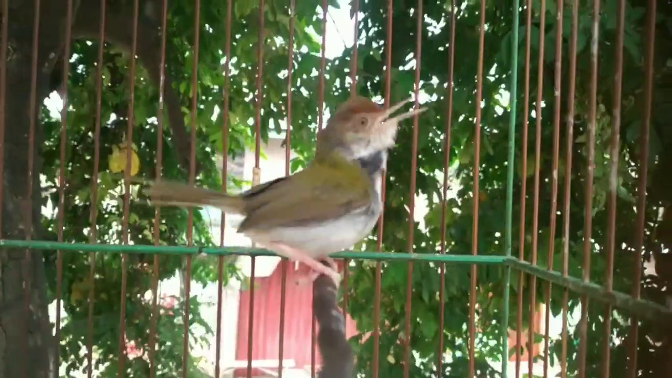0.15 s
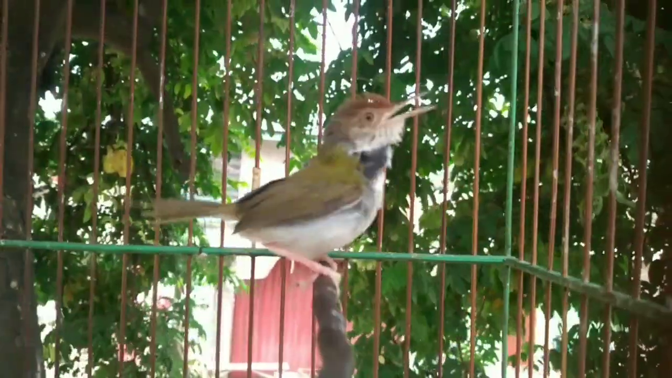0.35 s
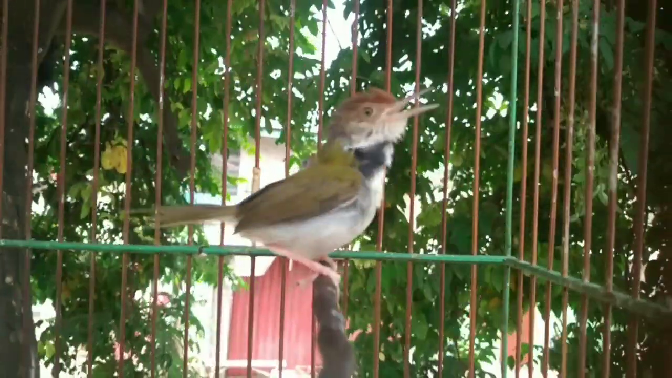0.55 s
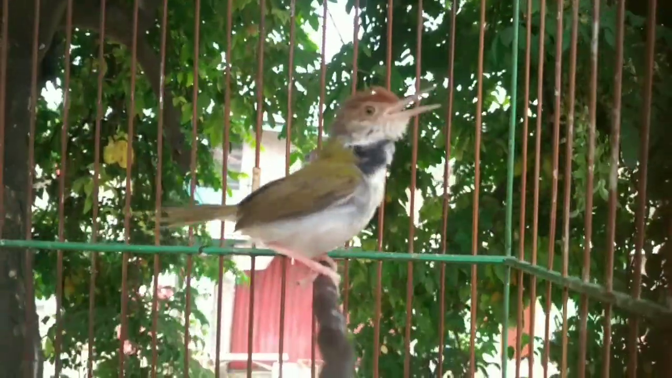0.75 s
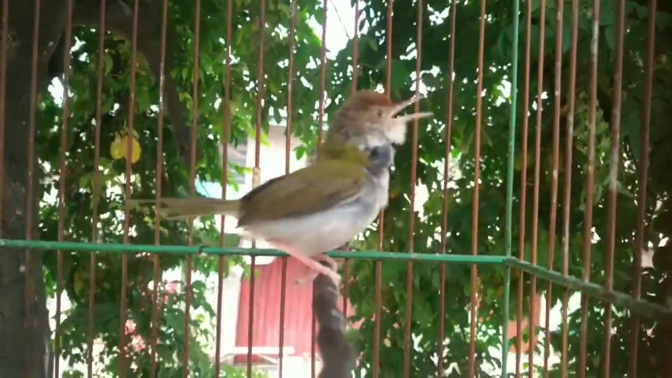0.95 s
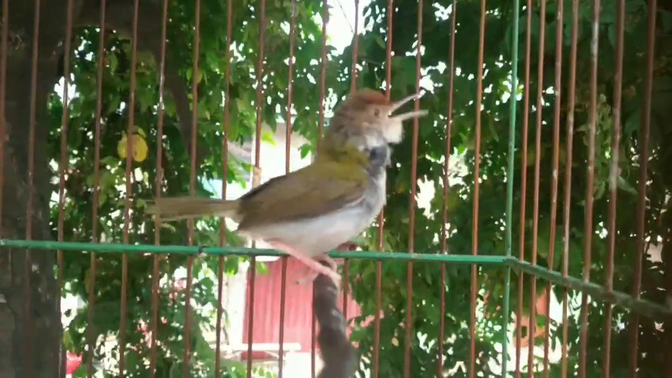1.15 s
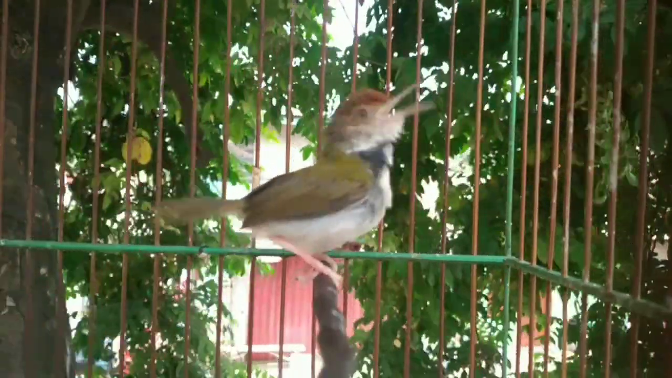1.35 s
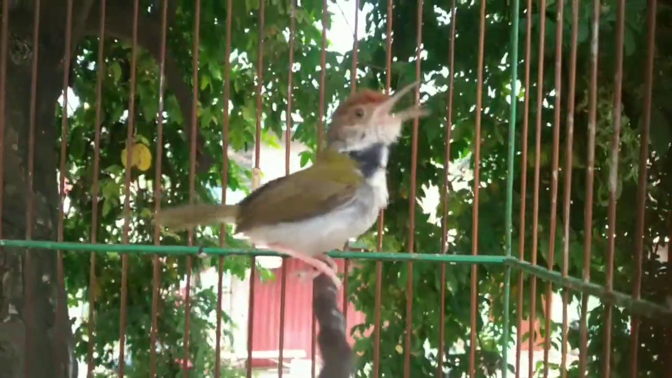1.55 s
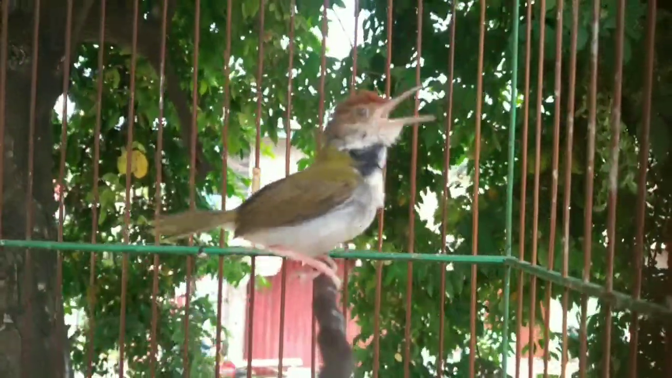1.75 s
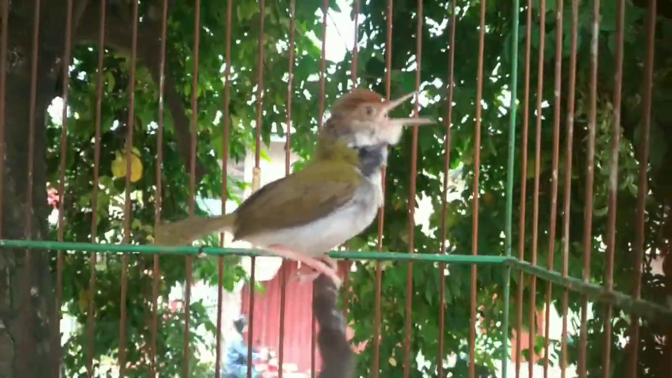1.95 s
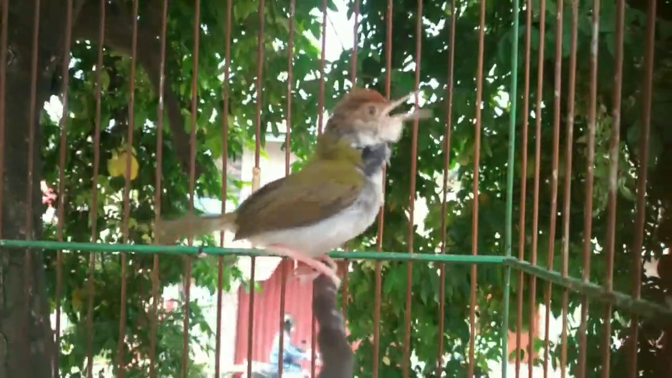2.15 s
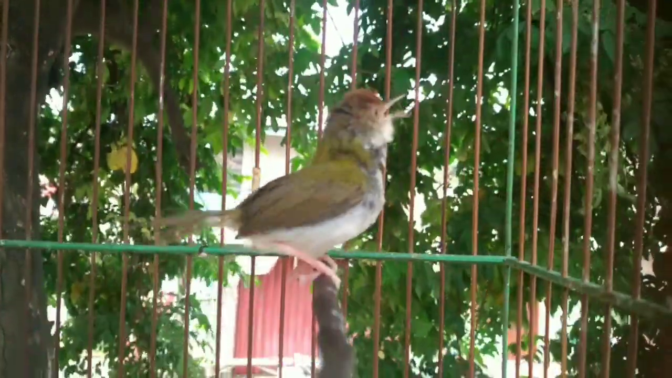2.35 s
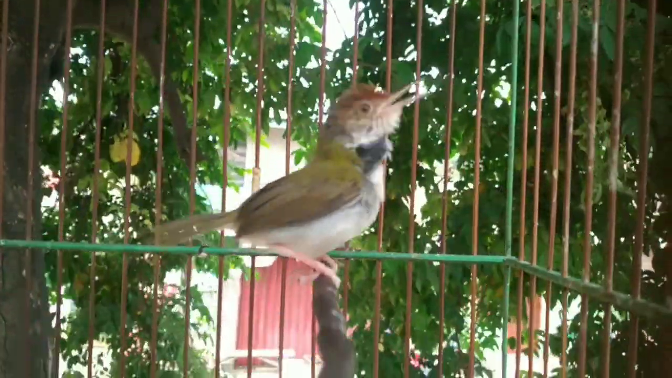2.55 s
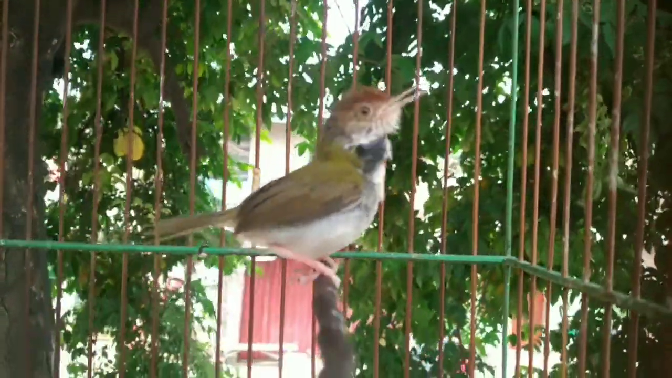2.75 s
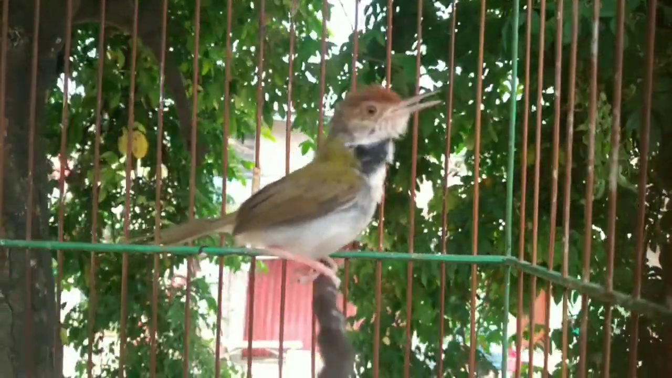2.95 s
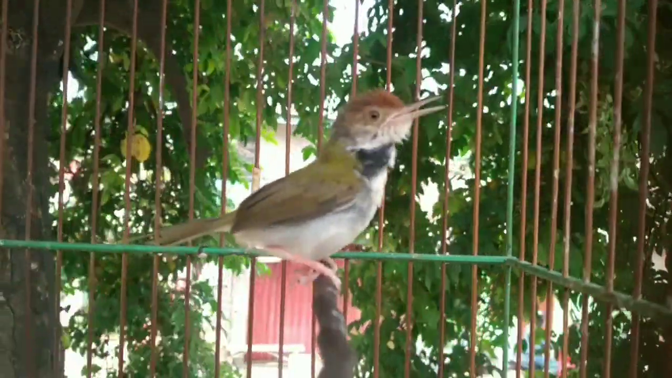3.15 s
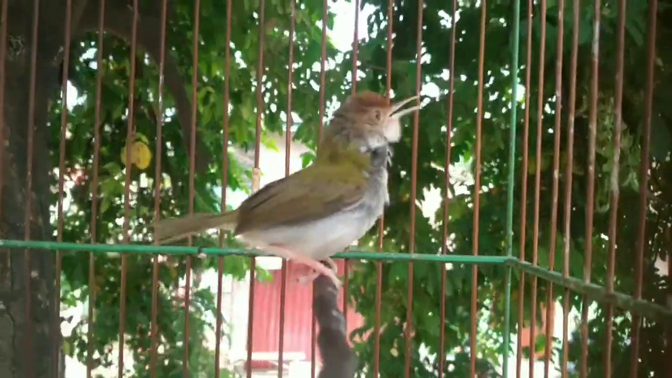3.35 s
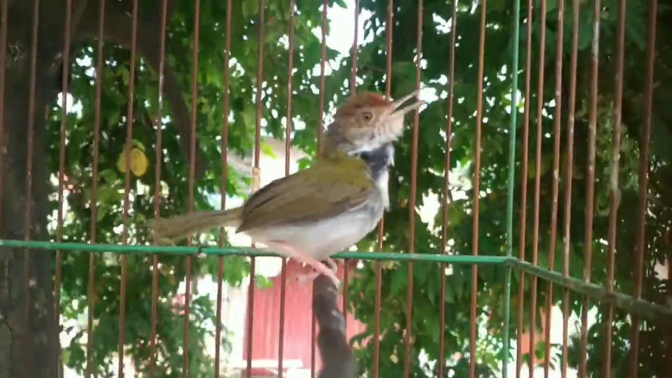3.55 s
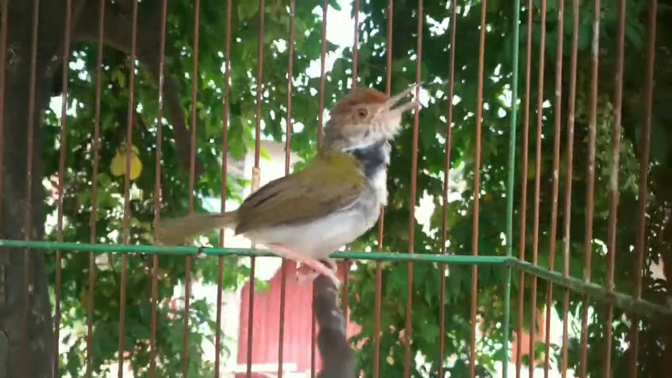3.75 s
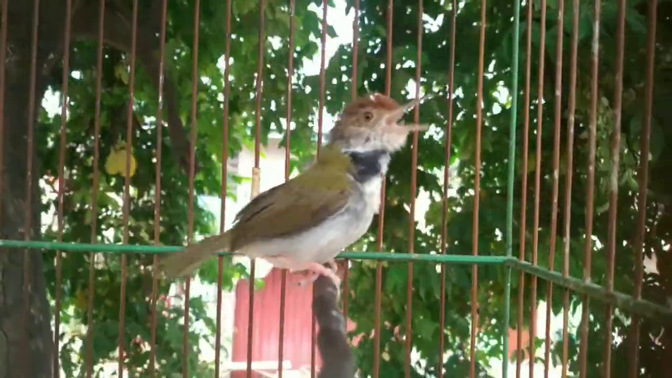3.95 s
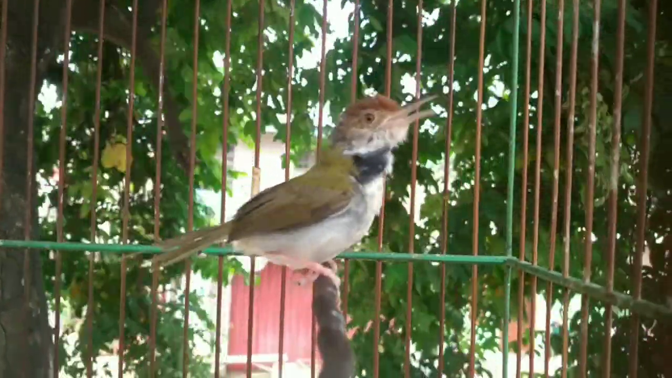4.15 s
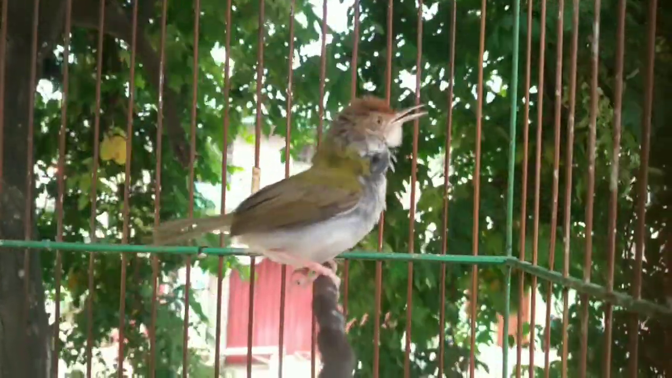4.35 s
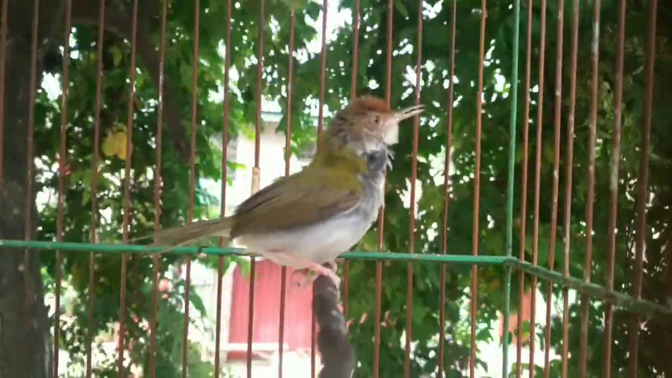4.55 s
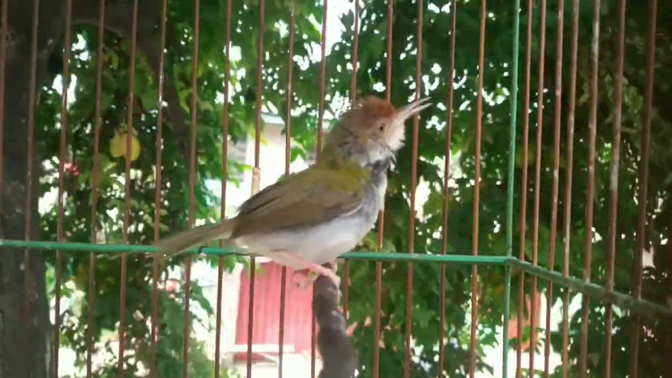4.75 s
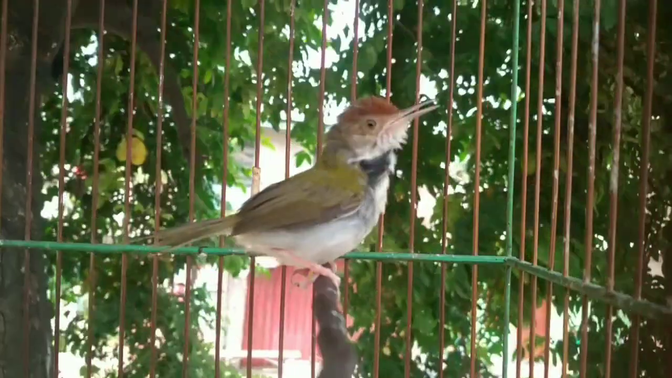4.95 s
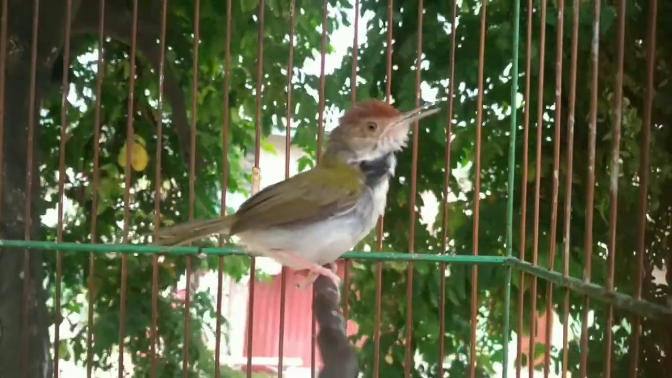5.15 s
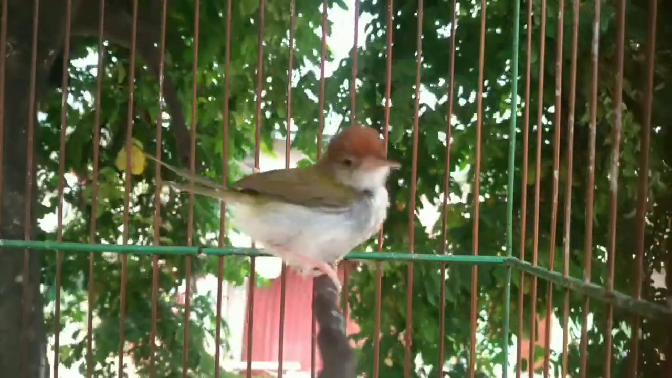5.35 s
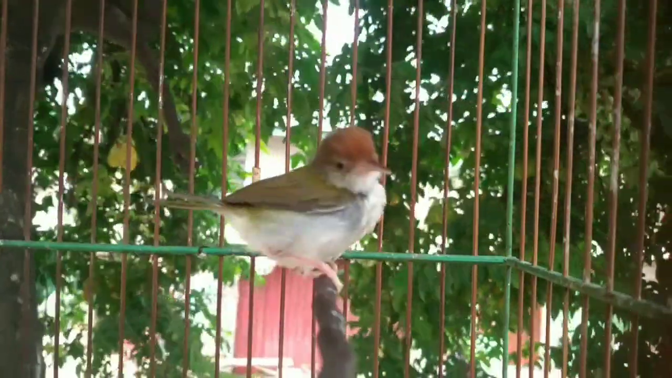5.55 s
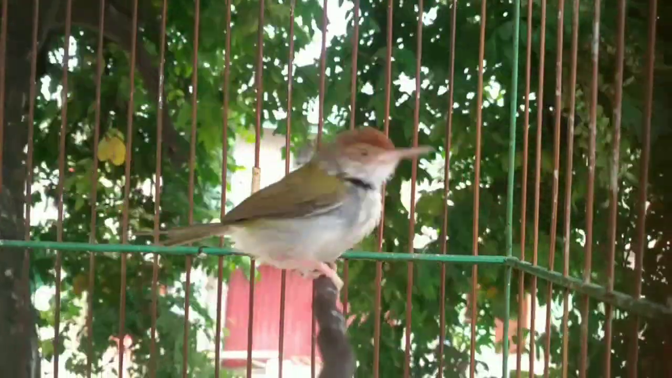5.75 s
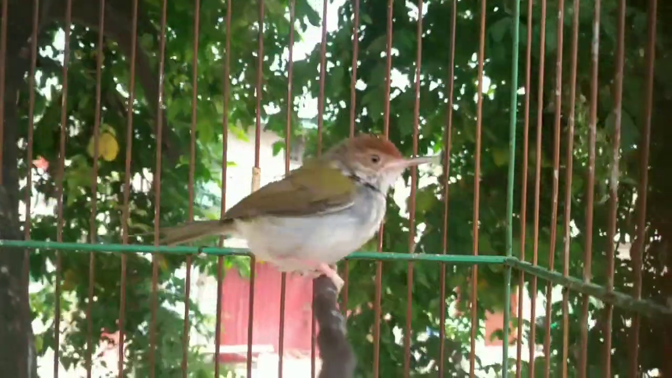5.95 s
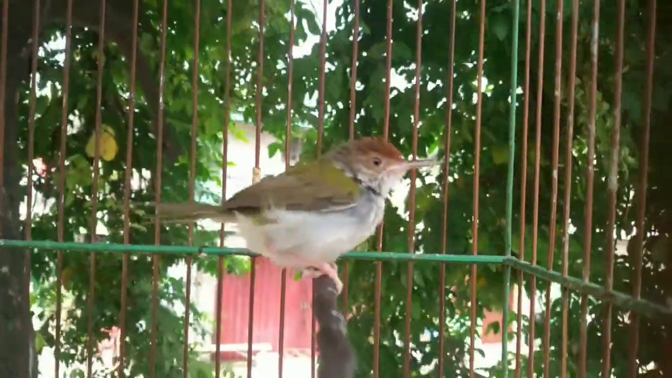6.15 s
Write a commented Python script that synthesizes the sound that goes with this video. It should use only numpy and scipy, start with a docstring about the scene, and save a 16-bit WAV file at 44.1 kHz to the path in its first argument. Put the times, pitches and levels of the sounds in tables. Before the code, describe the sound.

A small caged songbird sings close to the microphone in a garden, repeating one short, loud, rising whistle about five times a second. The piercing notes distort a little and leave a brief echo. After about five seconds the song stops, and a few soft, low puffs of air from its wings hit the microphone. A motorbike idles some way off over faint traffic throughout.

```python
"""A garden: a caged tailorbird repeats one loud rising note 24 times, close to a phone.
Each note starts soft and reedy, then air pressure swells it into a pure upward whistle that overloads
the right microphone. A motorbike idles some way off over far traffic, each firing ringing its exhaust.
After the song the bird turns on its perch and puffs of air from its wings thump the left port."""
import sys
import numpy as np
from scipy import signal
from scipy.fft import rfft, irfft, next_fast_len
from scipy.io import wavfile
from scipy.ndimage import uniform_filter1d

SR = 44100
rng = np.random.default_rng(int(sys.argv[2]) if len(sys.argv) > 2 else 0)


def log_audio(samples):
    """Write samples as a 16-bit WAV file to the path given in sys.argv[1]."""
    # one column per channel
    frames = np.atleast_2d(samples).T
    # limit to full scale, then quantise
    limited = np.clip(frames, -1, 1)
    pcm = np.round(limited * 32767).astype(np.int16)
    wavfile.write(sys.argv[1], SR, pcm)


N = 277246
TIME_S = np.arange(N) / SR

# The song. Each row: start in seconds, length in ms, top pitch in Hz, gain in dB.
NOTES = [(0.1152, 75.8, 3900, 2), (0.3191, 78.6, 3907, 3), (0.527, 77.7, 3926, 3), (0.7295, 79.8, 3918, 4),
         (0.9374, 77.8, 3886, 4), (1.1435, 73.6, 3782, 2.5), (1.3504, 76.2, 3796, 3),
         (1.5617, 81.7, 3836, 2.5), (1.7729, 78.6, 3877, 3.5), (1.9815, 79.4, 3800, 2),
         (2.1943, 79, 3832, 2), (2.4046, 77.9, 3857, 1.46), (2.6189, 78.3, 3778, 2.5),
         (2.8377, 79, 3788, 2), (3.0568, 81.7, 3768, 2.5), (3.2872, 74.4, 3772, 3.5),
         (3.5083, 78.5, 3773, 2), (3.7293, 80.4, 3755, 3), (3.9617, 79.8, 3778, 3), (4.19, 77.6, 3770, 3.5),
         (4.408, 79.5, 3758, 2), (4.6324, 76.6, 3722, 2.3), (4.8583, 75.9, 3755, 2.4),
         (5.0946, 73.9, 3690, 3)]


def undb(db):
    """Decibels to gain."""
    return 10 ** (np.asarray(db) / 20)


def level(x, db):
    """Scale to an rms level."""
    return x * undb(db) / np.sqrt(np.mean(x ** 2))


def curve(hz, points):
    """Gain of a (Hz, dB) spectrum at the given frequencies."""
    points_hz, db = np.transpose(points)
    return undb(np.interp(np.log(np.maximum(hz, 1)), np.log(np.sort(points_hz)), db))


def colour(x, points):
    """Filter by a (Hz, dB) spectrum."""
    size = next_fast_len(x.shape[-1])
    gain = curve(np.fft.rfftfreq(size, 1 / SR), points)
    return irfft(rfft(x, size) * gain, size)[..., :x.shape[-1]]


def walk(rate_hz, size=N):
    """Random wander, spread about 1.3."""
    knots = rng.standard_normal(2048)
    return 1.54 * np.interp(np.arange(size) * rate_hz / SR, np.arange(len(knots)), knots)


def ramp(u):
    """Smooth step from 0 to 1."""
    return np.sin(np.pi / 2 * np.clip(u, 0, 1)) ** 2


def bump(at_s, width_s):
    """Bell-shaped swell, peak 1."""
    return np.exp(-((TIME_S - at_s) / width_s) ** 2)


def place(x, pan_db):
    """Pan by left minus right level."""
    return x * undb(np.array([[pan_db], [-pan_db]]) / 2)


def air_noise(shared):
    """Stereo noise; `shared` is the power fraction common to both sides."""
    return np.sqrt(shared) * rng.standard_normal(N) + np.sqrt(1 - shared) * rng.standard_normal((2, N))


def engine(scatter_db=0.8, jitter_s=0.00015):
    """One cylinder at idle: uneven firings ring the exhaust; its drone swells near 2 s, then fades."""
    # Each row: time in seconds, firing rate in Hz.
    idle = [(0.0, 19.0), (0.3, 19.0), (0.91, 21.6), (2.14, 22.1), (2.56, 20.6), (5.2, 20.4)]
    # Exhaust resonances. Each row: frequency in Hz, t60 in seconds, relative level in dB.
    exhaust = [(44.8, 0.33, -3), (83.1, 0.092, 1), (106.35, 0.18, -1), (144.9, 0.13, -0.5),
               (241.1, 0.095, -7), (311.4, 0.023, -13.5)]
    firing_hz = np.interp(TIME_S, *np.transpose(idle))
    firings = np.flatnonzero(np.diff(np.floor(np.cumsum(firing_hz) / SR)))
    timing, strength = rng.standard_normal((len(firings), 2)).T
    firings += (jitter_s * SR * timing).astype(int)
    pulses = np.zeros(N)
    pulses[np.clip(firings, 0, N - 1)] = undb(scatter_db * strength)
    t = TIME_S[:SR // 4]
    rings = [(-1) ** k * undb(db - 60 * t / t60_s) * np.sin(2 * np.pi * hz * t)
             for k, (hz, t60_s, db) in enumerate(exhaust)]
    thud = signal.fftconvolve(pulses, sum(rings[:3]))[:N]
    drone = signal.fftconvolve(pulses, sum(rings[3:]))[:N]
    drone_db = -47 + 13.5 * bump(at_s=2.05, width_s=2.06)
    return place(level(thud, -36) + level(drone, 0) * undb(drone_db), 0.45)


def traffic():
    """Far roads rumble and hiss from all sides; the hiss swells once and ebbs."""
    # Road spectra. Each row: frequency in Hz, gain in dB.
    rumble_spectrum = [(5, 4.5), (20, 1.5), (45, -3), (62, -11), (100, 2), (160, -8), (230, -8.5),
                       (330, -14.5), (500, -24), (900, -43), (3000, -100)]
    hiss_spectrum = [(300, -6), (550, 2.5), (1000, -4), (2000, -8.5), (3200, -8.5), (5000, -23.5),
                     (9000, -34.5), (11000, -42.5), (15000, -57)]
    rumble = level(colour(air_noise(shared=0.78), rumble_spectrum), -36.5) * undb(1.2 * walk(3.5))
    hiss_db = -53.5 + 7 * bump(at_s=2.22, width_s=1.88)
    hiss = level(colour(air_noise(shared=0.17), hiss_spectrum), 0) * undb(hiss_db + 1.8 * walk(4.8))
    return place(rumble, 2.26) + place(hiss, -0.5)


def breeze():
    """Moving air buffets each port on its own."""
    spectrum = [(5, 0), (25, -2.5), (60, -3), (120, -8.5), (250, -19), (1000, -69.5)]
    buffet = level(colour(air_noise(shared=0), spectrum), -46)
    return place(buffet * undb(2.8 * walk(0.67)), 5.4)


def insects():
    """Insects in the trees to the right: a faint, slowly swelling shimmer."""
    # Each row: frequency in Hz, gain in dB.
    shimmer_spectrum = [(1000, -47.5), (3000, -17), (5000, 3.5), (7800, -11.5), (9200, -0.5), (10500, -8),
                        (12500, -16.5), (15000, -22.5)]
    shimmer = level(colour(air_noise(shared=0.2), shimmer_spectrum), -78.5)
    return place(shimmer * undb(1.608 * walk(2.6)), -29.5)


def garden(x, near_t60_s=0.098, far_t60_s=0.31):
    """Cage and walls scatter a quick echo; trees and house fronts add a longer one."""
    t = TIME_S[:SR // 2]
    onset = ramp((t - 0.003) / 0.0032)
    near, far = (rng.standard_normal((2, len(t))) * onset * undb(-60 * t / t60_s)
                 for t60_s in (near_t60_s, far_t60_s))
    response = (level(near, -19.5) + level(far, -30)) / np.sqrt(len(t))
    wet = signal.fftconvolve(x[None], response, axes=1)[:, :N]
    return place(colour(wet, [(2500, 0.5), (3200, -4.5), (3800, 0.5), (6000, -9), (12000, -3.5)]), -6)


def lingering_echo():
    """The garden still rings from a note sung a moment earlier."""
    tone = note(*NOTES[0])
    echo = garden(np.pad(tone, (0, N - len(tone))))
    elapsed = len(tone) * 4 // 5
    return ramp(TIME_S / 0.0019) * np.pad(echo[:, elapsed:], ((0, 0), (0, elapsed)))


def glide(progress):
    """Pitch through a note: 0 at the opening pitch, 1 at the top."""
    scoop = 0.08 * np.exp(-progress / 0.056)
    creep = 0.88 * (progress - 0.15)
    leap = 0.39 * ramp((progress - 0.43) / 0.38)
    droop = 0.34 * np.exp((progress - 1) / 0.046)
    return creep + leap - scoop - droop


def note(start_s, length_ms, top_hz, gain_db, attack_ms=10.7, release_ms=11, rise_ms=24.9, tick_ms=2):
    """One syllable: rising air pressure lifts the pitch and turns a reedy tone into a loud whistle."""
    # Throat and beak response. Each row: frequency in Hz, gain in dB.
    beak = [(2500, -2), (3000, 1), (3400, 0.5), (3800, -.5), (4100, -2)]
    # Overtones while the syrinx doubles its period. Each row: multiple of the pitch, level in dB.
    overtones = [(1.5, -30), (2, -40.5), (2.5, -62), (3, -44.5), (3.5, -41.5), (4, -53)]
    # As the bird settles into its run, notes open lower and swell later.
    fresh = np.exp(-start_s / 1.8)
    opening_hz = 2661.5 + 101.5 * fresh
    swell_start_ms = 24.87 - 11.9 * fresh
    size = SR // 10
    ms = np.arange(size) * 1000 / SR
    progress = np.minimum(ms / length_ms, 1)
    pressure = ramp((ms - swell_start_ms) / rise_ms)
    jitter = 0.0038 * (0.42 + pressure) * walk(451, size)
    hz = (opening_hz + (top_hz - opening_hz) * glide(progress)) * (1 + jitter)
    phase = 2 * np.pi * np.cumsum(hz) / SR
    crest_db = 3 * ramp((progress - 0.8) / 0.278)
    envelope_db = gain_db - 7.5 * (1 - pressure) + crest_db + 0.5 * walk(400, size)
    reed = sum(undb(db + 2 * walk(76, size)) * np.sin(k * phase) for k, db in overtones)
    reed *= ramp(ms / 6) * (1 - pressure)
    second = undb(-35 + 3 * walk(180, size)) * np.sin(2 * phase)
    third = undb(-35) * np.sin(3 * phase)
    whistle = curve(hz, beak) * np.sin(phase) + pressure * (second + third)
    whistle *= np.sqrt(ramp(ms / attack_ms)) * ramp((length_ms + 2.84 - ms) / release_ms)
    # The syrinx opens with a tiny tick.
    tick_spectrum = [(1200, -17), (2500, 27.5), (4000, 13.5), (7000, -30.5), (14000, -45)]
    tick = ramp(ms / tick_ms) * np.exp(-ms / tick_ms) * colour(rng.standard_normal(size), tick_spectrum)
    return undb(envelope_db) * (whistle + reed) + undb(-32) * tick


def bird():
    """The run of notes; a grainy overload hiss rides the loudest part of each, more in some than others."""
    song = np.zeros(N)
    for start_s, *shape in NOTES:
        tone = note(start_s, *shape)
        start = int(start_s * SR)
        song[start:start + len(tone)] += tone
    hiss_spectrum = [(500, -1.5), (1600, 14.5), (4000, 8), (9000, 11), (15000, -14)]
    hiss = level(colour(rng.standard_normal(N), hiss_spectrum), -33)
    hiss *= undb(3 * np.tanh(walk(2.5) + walk(50)))
    power = uniform_filter1d(song ** 2, size=60)
    return song + hiss * power * ramp(power / 0.45)


def whines(flutter_db=4):
    """Faint far tones swell, drift and fade."""
    # Each row: start and end in seconds, start and end pitch in Hz, gain in dB.
    tones = [(2.873, 3.336, 627, 649, -51.5), (3.024, 3.28, 456, 440, -51), (3.58, 3.857, 830, 760, -59),
             (3.748, 4.046, 774.4, 644, -48), (3.984, 4.17, 584, 572, -55.5),
             (5.041, 5.278, 394.3, 375, -51.5), (6.254, 6.294, 317, 320, -32.5)]
    out = np.zeros(N)
    for start_s, end_s, from_hz, to_hz, db in tones:
        span = (TIME_S >= start_s) & (TIME_S < end_s)
        progress = np.linspace(0, 1, span.sum())
        hz = (from_hz + (to_hz - from_hz) * progress) * (1 + 0.022 * walk(110, len(progress)))
        swell = np.sqrt(2 * np.abs(np.sin(np.pi * progress)))
        gain = undb(db + flutter_db * walk(22, len(progress)))
        out[span] += gain * swell * np.sin(2 * np.pi * np.cumsum(hz) / SR)
    return place(out, 3)


def puffs(edge_ratio=1.54):
    """Each wing flick pushes a short, low gust over the ports."""
    # Each row: start in seconds, level in dB, centre in Hz, length in seconds, left minus right in dB.
    gusts = [(5.328, -37.5, 115, 0.042, 21.5), (5.457, -30, 135.5, 0.028, 29), (5.475, -29, 236, 0.015, 19),
             (5.502, -33, 70.3, 0.035, 22), (5.588, -37.5, 168, 0.017, 27), (5.631, -30, 114.8, 0.034, 22),
             (5.68, -44, 130, 0.026, 25), (5.832, -31, 69, 0.035, 8)]
    out = np.zeros((2, N))
    t = TIME_S[:SR // 4]
    for start_s, db, hz, length_s, pan_db in gusts:
        band = signal.butter(1, [hz / edge_ratio, hz * edge_ratio], "band", fs=SR, output="sos")
        noise = signal.sosfilt(np.vstack([band] * 3), rng.standard_normal(2 * len(t)))[len(t):]
        swell = 2 * t / length_s * np.exp(1 - 2 * t / length_s)
        weighted_rms = np.sqrt(np.average(noise ** 2, weights=swell ** 2))
        start = int(start_s * SR)
        out[:, start:start + len(t)] += place(noise * swell * undb(db) / weighted_rms, pan_db)
    return out


def feathers(flutter_db=4):
    """Feathers brush softly as the bird turns."""
    spectrum = [(1000, -17), (2800, 5), (5500, -12), (9000, -24), (14000, -37.5)]
    brush = level(colour(air_noise(shared=0.45), spectrum), -61)
    return brush * bump(at_s=5.51, width_s=0.027) * undb(flutter_db * walk(150))


def scene(left_delay_samples=11):
    """The bird faces the right port; its song reaches the left one later and weaker."""
    # Response of the averted port, with interference notches. Each row: frequency in Hz, gain in dB.
    left_port = [(2500, -11), (2620, -10.5), (2730, -16), (2830, -6), (2950, -3.5), (3120, -7),
                 (3330, -3.5), (3500, -8), (3680, -27), (3800, -16.5), (3950, -11), (5500, -26),
                 (9000, -40), (15000, -30.5)]
    song = bird()
    left = np.roll(colour(song, left_port), left_delay_samples)
    background = engine() + traffic() + breeze() + insects() + whines()
    return np.array([left, song]) + garden(song) + lingering_echo() + puffs() + feathers() + background


def record(dry, ceiling=0.9, cutoff_hz=15500):
    """The input stage clips hard, adding a bright third harmonic; the top is cut."""
    oversampled = signal.resample_poly(dry, 4, 1, axis=1)
    clipped = signal.resample_poly(np.clip(oversampled, -ceiling, ceiling), 1, 4, axis=1)
    lowpass = signal.firwin(301, cutoff_hz, fs=SR)
    return signal.fftconvolve(clipped, lowpass[None], "same", axes=1)


dry = scene()
out = record(dry)
log_audio(out)
```